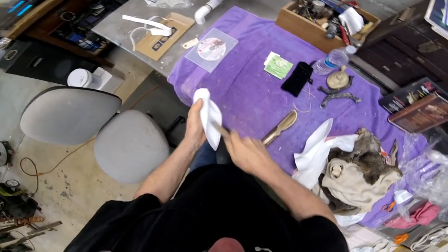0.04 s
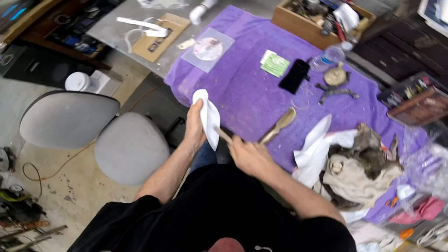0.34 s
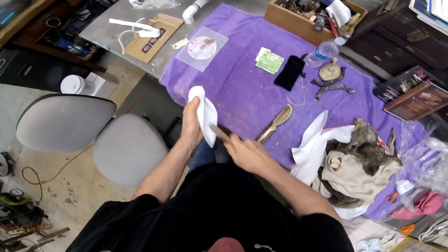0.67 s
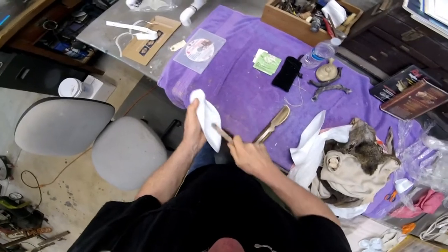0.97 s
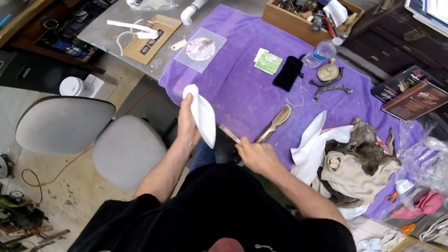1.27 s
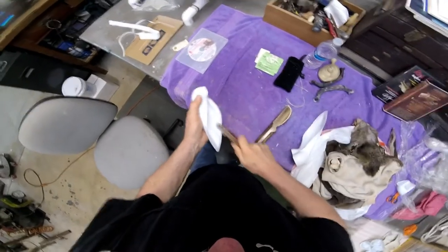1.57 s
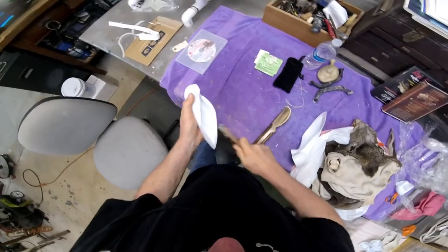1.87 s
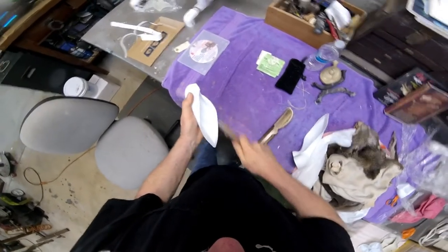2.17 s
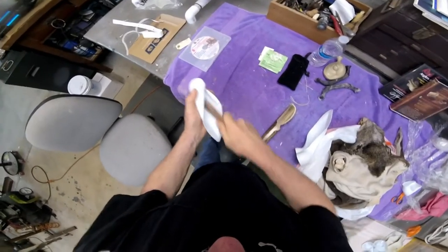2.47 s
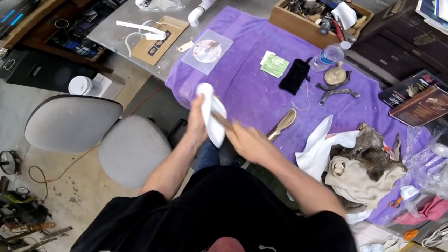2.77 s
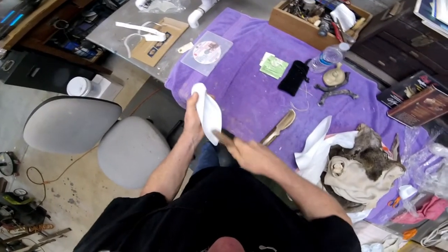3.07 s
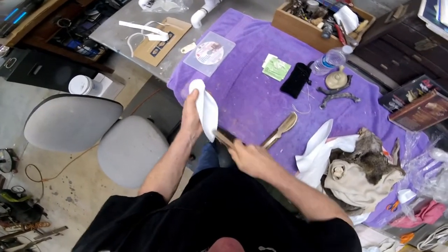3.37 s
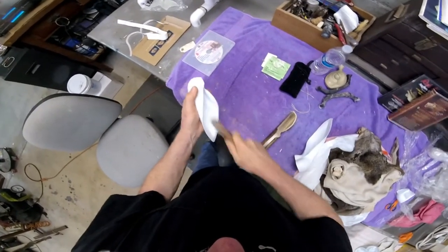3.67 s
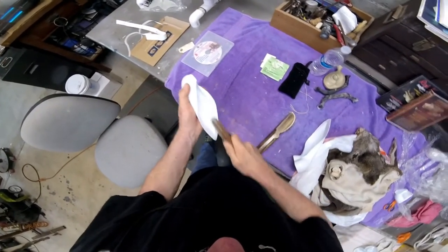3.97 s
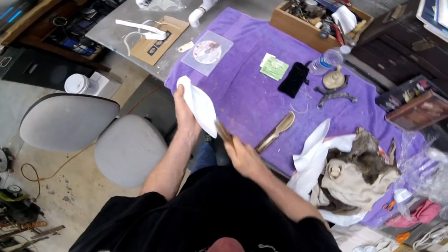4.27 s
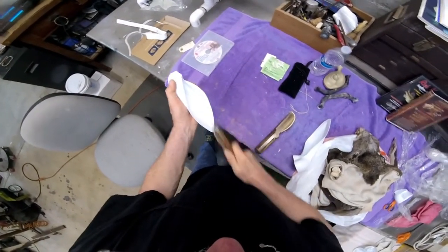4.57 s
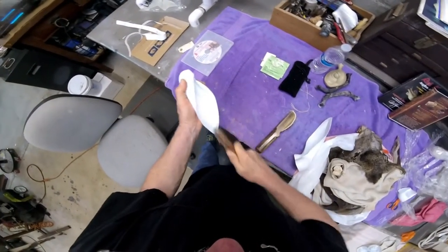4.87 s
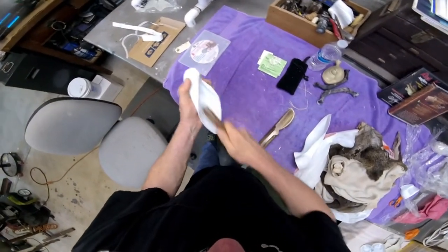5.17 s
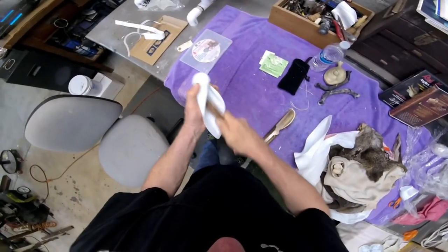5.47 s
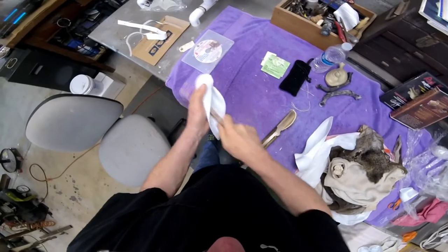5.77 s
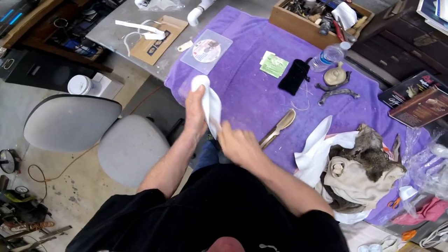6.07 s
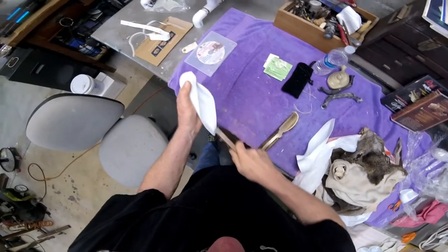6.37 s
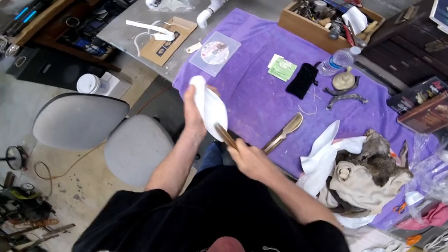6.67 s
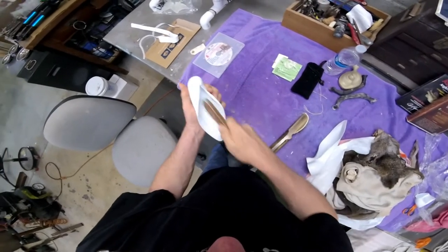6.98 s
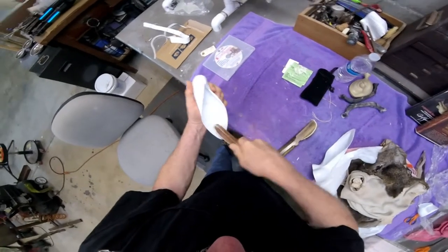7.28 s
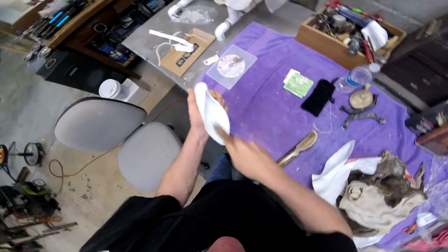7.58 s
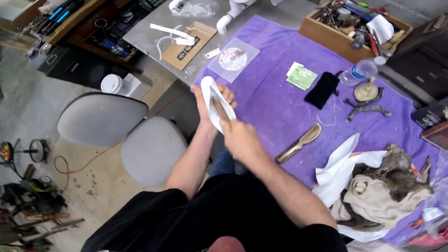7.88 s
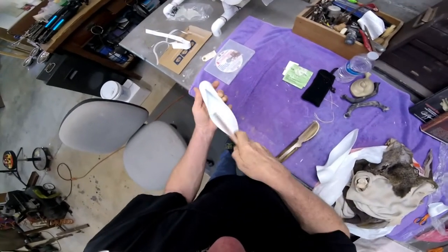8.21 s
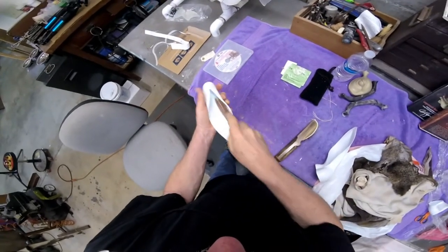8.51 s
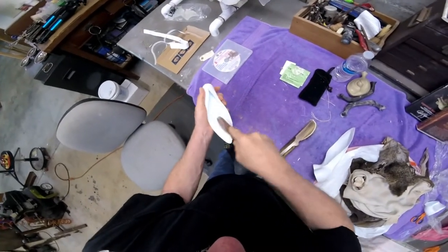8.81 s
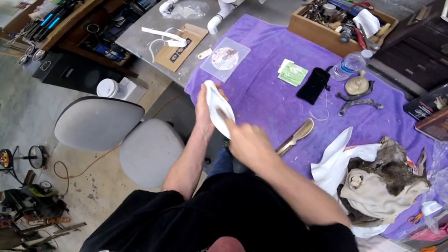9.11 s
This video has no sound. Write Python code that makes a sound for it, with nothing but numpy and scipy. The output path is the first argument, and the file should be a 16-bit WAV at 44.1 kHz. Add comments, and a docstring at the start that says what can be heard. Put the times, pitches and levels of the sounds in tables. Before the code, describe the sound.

Quick, even strokes of a steel file scrape a plastic edge, skipping and ticking between pushes in a small room with faint ventilation.

```python
"""A steel hand file works the edge of a hand-held plastic shell in a small workshop, in mono.
Each push rasps as the teeth shave the plastic; the file chatters on the way back and ticks as it is
set down. The shell colours every contact and the blade adds a hiss. The room answers, over a few
soft bumps, ventilation rumble and a low machine hum."""
import sys
import numpy as np
from scipy import signal
from scipy.fft import rfft, irfft
from scipy.io import wavfile
from scipy.ndimage import map_coordinates

SR = 44100
rng = np.random.default_rng(int(sys.argv[2]) if len(sys.argv) > 2 else 0)


def store_wav(level_fs):
    """Save 16-bit WAV to argv[1]."""
    pcm = np.round(np.clip(np.atleast_2d(level_fs), -1, 1) * 32767)
    wavfile.write(sys.argv[1], SR, pcm.T.astype(np.int16))


N = 407925

# cutting pushes: start_s, hardest_s, end_s, level_db, hiss_db, hiss_drift_db
PUSHES = [(0.065, 0.127, 0.21, -27.5, -27.5, -1), (0.386, 0.465, 0.539, -28.5, -29.5, 1),
          (0.716, 0.745, 0.853, -30, -26, 5), (1.058, 1.1, 1.165, -33, -36.5, -19),
          (1.384, 1.523, 1.547, -34.5, -38.5, -8), (1.67, 1.745, 1.788, -34, -33.5, 1.5),
          (1.992, 2.096, 2.118, -24, -29, 9), (2.366, 2.397, 2.58, -30, -30, 1.5),
          (2.779, 2.846, 2.955, -27.5, -26.5, 7.5), (3.147, 3.199, 3.317, -27.5, -30, -2),
          (3.493, 3.543, 3.658, -29, -29.5, -5), (3.795, 3.826, 3.916, -32, -23.5, 2),
          (4.087, 4.103, 4.246, -33.5, -32.5, -8.5), (4.387, 4.422, 4.501, -31.5, -34.5, 6),
          (4.696, 4.72, 4.847, -32, -32.5, 8.5), (5.042, 5.054, 5.209, -29.5, -30.5, -19),
          (5.383, 5.483, 5.541, -29, -29, -10), (5.717, 5.776, 5.884, -33.5, -37.5, 1),
          (6.043, 6.17, 6.262, -30.5, -34, 9), (6.453, 6.483, 6.6, -34.0, -34.0, -12),
          (6.564, 6.64, 6.698, -35, -35.5, -7), (7.024, 7.09, 7.181, -28.5, -29.5, 11),
          (7.39, 7.453, 7.554, -28.5, -30, 9), (7.79, 7.866, 7.99, -32, -33, 4.0),
          (8.565, 8.632, 8.722, -32.5, -33, 1), (8.951, 9.028, 9.1, -30.5, -31, 2)]
# shell response along the edge: time_s, ring_hz, ring_db, thud_rel_db, sizzle_db
EDGE_RESPONSE = [(.14, 2040, 5.5, -20, 4), (.75, 2550, 7, -14.5, 6.5), (1.45, 2550, -2, -13, 9),
                 (2.42, 2340, 8, -11.5, 2), (3.2, 2100, 5, -21.5, 4), (3.85, 1670, 10.5, -10.5, 1.5),
                 (4.75, 1450, 15, -14, 2), (5.7, 1620, 5.5, -10, -1), (6.5, 1430, 12.5, -13, -0.5),
                 (7.8, 1350, 12, -13.5, 8), (8.8, 1280, 8, -11.5, 10)]
# deeper swell of the late pushes: time_s, extra_depth_ratio
SWELL_DEPTH = [(6.5, 0), (8.5, 0.37)]


def strokes(ease_in_db=-8.5, ease_out_db=-10.0, attack_s=0.02, release_s=0.031,
            thud_trim_db=-2.2, hiss_trim_db=-1.9, hiss_follow=0.64, lean_db=11.5):
    """Many teeth tear tiny chips at once: a dense rasp that swells with the hand's trembling push."""
    out = np.zeros(N)
    edge_s, *edge_columns = np.transpose(EDGE_RESPONSE)
    for start, hardest, end, level_db, hiss_db, drift_db in PUSHES:
        ring_hz, ring_db, thud_db, sizzle_db = (np.interp(hardest, edge_s, c) for c in edge_columns)
        t = np.arange(int((end - start) * SR)) / SR
        teeth = .45 + stick_slip(t, rate_hz=1100, scatter=.5, spread_db=1.8, fade_s=.001)
        chips = blade_echo(teeth * rng.standard_normal(len(t)), t)
        bands = shell(chips, ring_hz, ring_db, sizzle_db=sizzle_db)
        thud, rasp, hiss = (unit(band[:len(t)]) for band in bands)
        rising, lifting = hand_ramps(start + t, start, hardest, end)
        ease_db = ease_in_db * rising + ease_out_db * lifting
        push_db = ease_db + np.interp(start, *np.transpose(SWELL_DEPTH)) * (ease_db - ease_db.mean())
        contact = np.clip(np.minimum(t / attack_s, (t[-1] - t) / release_s), 0, 1)
        tremble_db = 1.44 * wander(t, 57)
        yield_db = 0.25 * wander(t, 253)  # plastic gives way unevenly
        clog_db = 1.44 * wander(t, 115)  # chips clog and clear the teeth
        along = t / t[-1] - .5
        thud = amp(thud_db + thud_trim_db + lean_db * along) * thud  # the hand bears down
        body = amp(level_db + push_db) * (thud + amp(yield_db) * rasp)
        blade = amp(hiss_db + hiss_trim_db + hiss_follow * push_db + drift_db * along + clog_db) * hiss
        add(out, start, contact * amp(tremble_db) * (body + blade))
    return out


# return skips: start_s, hardest_s, end_s, level_db, thud_rel_db, hiss_rel_db, ring_hz, ring_db
SKIPS = [(0.016, 0.02, .055, -36, -12.5, -8, 3000, 10), (0.317, 0.33, .365, -25, -12.5, -5, 2450, 12),
         (0.57, 0.587, .605, -36.5, -2, -6.5, 1200, 8), (0.611, 0.665, .69, -26, -21, -8.5, 1950, 8),
         (0.865, 0.908, .91, -39, -17, -5.5, 980, 13), (0.986, 1.006, 1.045, -32, -11.5, -17, 2120, 6),
         (1.136, 1.163, 1.18, -29, -9, -5.5, 2230, 2), (1.764, 1.787, 1.81, -26, -10, -1, 1410, 4.5),
         (2.729, 2.743, 2.762, -29.5, -5.5, -3, 1630, 9), (3.082, 3.105, 3.125, -27.5, -9, -7.5, 1710, 1),
         (3.326, 3.337, 3.36, -35.5, -2.5, -5, 1850, 6), (3.429, 3.441, 3.464, -23, -15, -10, 2010, 20.5),
         (3.666, 3.693, 3.715, -26.5, -4.5, -10, 1750, 15),
         (3.716, 3.754, 3.777, -29, -4.5, -5.5, 1730, 10),
         (4.013, 4.034, 4.07, -31.5, -10.5, -13, 1650, 12.5), (4.273, 4.359, 4.375, -26, -14, -7, 1690, 14),
         (4.473, 4.504, 4.525, -27, -23, -4, 1500, 8), (4.975, 4.993, 5.025, -28.5, -18.5, -6.5, 1880, 33),
         (5.249, 5.316, 5.36, -27, -20.5, -7.5, 1910, 16.5),
         (5.564, 5.581, 5.612, -31.5, -7, -10, 1520, 15),
         (5.628, 5.674, 5.695, -23, -22.5, -9.5, 2200, 12.5), (5.919, 5.98, 5.988, -23.5, -9, -9, 2020, 6),
         (5.981, 6.011, 6.04, -18, -17.5, -6.5, 2320, 14), (6.293, 6.319, 6.33, -37, -4.5, -7, 1520, 18),
         (6.409, 6.417, 6.46, -31, -14.5, -7, 2300, 13), (6.952, 6.961, 6.985, -32.5, -10, -7, 1600, 16),
         (7.706, 7.715, 7.765, -36.5, -5.5, -5.5, 1610, 19),
         (8.359, 8.374, 8.41, -43, -12.5, -10.5, 1630, 13), (8.845, 8.886, 8.9, -31, -7, -5.5, 1370, 15),
         (9.147, 9.185, 9.2, -35, -12, -10.5, 1870, 15)]


def chatter(onset_db=-6.0, swell_db_per_s=143.0, lift_db=-17.0, skid=0.64):
    """Under light load the file hops from tooth to tooth: coarse catches over a skid."""
    out = np.zeros(N)
    for start, hardest, end, level_db, thud_db, hiss_db, ring_hz, ring_db in SKIPS:
        t = np.arange(int((end - start) * SR)) / SR
        landing_db = onset_db - swell_db_per_s * (hardest - start)  # short skips land hard
        rising, lifting = hand_ramps(start + t, start, hardest, end)
        load = amp(landing_db * rising ** 2 + lift_db * lifting ** 1.15)
        hops = skid + stick_slip(t, rate_hz=200, scatter=.35, spread_db=0.15, fade_s=0.0033)
        force = load * hops * rng.standard_normal(len(t))
        force = blade_echo(force, t, first_s=0.001217, last_s=0.000786)
        bands = shell(force, ring_hz, ring_db, hollow_db=5.5, sizzle_db=-2.7)
        add(out, start, amp(level_db) * mix_bands(bands, (thud_db, 0, hiss_db), len(t)))
    return out


# file knocks on the edge: time_s, level_db, thud_rel_db, hiss_rel_db, ring_hz
KNOCKS = [(.235, -30.5, -2.5, -19, 1200), (.89, -34, -9, 1, 2200), (.914, -26, -22, -5, 3030),
          (.922, -26, -25, -13, 2150), (.984, -23, -18, -11, 2220), (.991, -25, -18, -2, 2320),
          (1.371, -18, -8.5, -18.5, 1700), (1.668, -29, -1.5, -13, 1520), (1.773, -18.5, -9, -3, 1220),
          (1.975, -26, -22, -10, 1500), (2.314, -9.5, -21, -16, 2900), (2.327, -10.5, -19, -10, 3060),
          (2.346, -24.5, -21, 3, 3000), (3.085, -22, -16, -17, 1310), (3.205, -22, -33, -20, 2000),
          (3.958, -34, -7, -20, 1730), (3.975, -28, -6, -20.5, 1630), (4.677, -27, 5, -12, 1640),
          (4.848, -24.5, -36, -10, 1500), (4.854, -25, -33, -21, 1290), (4.98, -20, -5.5, -1, 2300),
          (4.99, -17, -23, 2, 1880), (5.235, -27.5, -9, -10, 1270), (5.397, -27.5, -31, 4, 2020),
          (5.411, -18.5, -30, -1.5, 2010), (5.926, -22.5, -9, -7, 2220), (6.969, -25.5, -12, -9, 1870),
          (7.353, -26.5, -23, -16, 1340), (7.367, -28, 4, -8.5, 1300), (7.998, -31, -31, -11, 1740),
          (8.497, -38, 7, -2, 1240), (8.51, -21.5, -5.5, -8, 1370), (8.765, -36.5, -0.5, -10, 1270),
          (8.845, -23, -16, -32, 1180)]


def ticks(gain_db=-5.5, hiss_trim_db=2.5, rise_s=0.000083, fade_s=0.0029):
    """Single hard catches of the teeth, each gone in milliseconds."""
    out, t = np.zeros(N), np.arange(SR // 50) / SR
    for start, level_db, thud_db, hiss_db, ring_hz in KNOCKS:
        force = (1 - np.exp(-t / rise_s)) * np.exp(-t / fade_s) * rng.standard_normal(len(t))
        bands = shell(force, ring_hz, ring_db=13.0, hollow_db=11.0, hollow_hz=291.0, ripple_db=1.16)
        tick = mix_bands(bands, (thud_db, 0, hiss_db + hiss_trim_db), SR // 250)
        add(out, start, amp(level_db + gain_db) * tick)
    return out


def stick_slip(t, rate_hz, scatter, spread_db, fade_s):
    """Teeth catch at uneven intervals; each release dies away."""
    gap_draw, size_draw = rng.standard_normal((int(t[-1] * rate_hz * 2) + 4, 2)).T
    gaps = np.exp(scatter * gap_draw)
    slip_s = (np.cumsum(gaps) - gaps[0]) / rate_hz
    latest = np.searchsorted(slip_s, t, side="right") - 1
    strength = amp(spread_db * np.clip(size_draw[latest], -2, 2))
    return unit(strength * np.exp(-(t - slip_s[latest]) / fade_s))


def hand_ramps(t, start, hardest, end):
    """Distance from the hardest push: 1 to 0 going in, 0 to 1 going out."""
    return np.interp(t, [start, hardest], [1, 0]), np.interp(t, [hardest, end], [0, 1])


def blade_echo(force, t, first_s=0.000362, last_s=0.000927, gain=.22):
    """A faint wave returns from the file's end; its delay shifts as the contact travels."""
    travel = (1 - np.cos(np.pi * t / t[-1])) / 2
    delay_s = (first_s + (last_s - first_s) * travel) * np.exp(0.224 * rng.standard_normal())
    return force + gain * map_coordinates(force, [(t - delay_s) * SR], order=3)


# file-on-plastic spectrum: freq_hz, gain_db
CONTACT_SPECTRUM = [(150, -3.5), (280, -7), (420, -6), (1000, -5.5), (2000, -4.5), (3000, -6.5), (4100, -5),
                    (5300, 1.5), (7000, -8.5), (9000, -15), (12000, -32.5), (14500, -43)]
# shell and blade resonances and dips: centre_hz, width_hz, gain_db
SHELL_MODES = [(452, 320, 7.5), (622, 33, 5.5), (730, 44, 6), (865, 41, -9.5), (905, 50, 5), (1248, 28, 6),
               (1580, 200, -0.5), (1720, 84, -5), (1878, 37, 5.5), (2141, 59, 1.5), (2610, 100, -0.5),
               (3082, 91, 4.5), (3440, 370, 0.6), (4350, 330, -2.9), (6545, 360, 6)]


def shell(force, ring_hz, ring_db, hollow_db=0., sizzle_db=0., hollow_hz=363.0, ripple_db=2.35,
          crossovers_hz=(800, 3600), size=2048):
    """A contact force radiates in three bands: shell thud, shell rasp, blade hiss."""
    f = np.arange(size // 2 + 1) * SR / size
    db = log_interp(f, *np.transpose(CONTACT_SPECTRUM))
    db += sum(gain_db * bell(f, hz, width_hz) for hz, width_hz, gain_db in SHELL_MODES)
    db += ring_db * bell(f, ring_hz, width_hz=0.66 * ring_hz)
    db += hollow_db * bell(f, hollow_hz, width_hz=186)
    db += sizzle_db * bell(f, 9640, width_hz=6100)
    db += ripple_db * wander(np.sqrt(f), .7)  # each contact point favours other small modes
    sound = signal.fftconvolve(force, minimum_phase(db, size))
    bass_cut = signal.butter(2, 220, "high", fs=SR, output="sos")  # a small shell radiates no bass
    sound = signal.sosfilt(bass_cut, sound)
    lowpasses = (signal.butter(4, hz, fs=SR, output="sos") for hz in crossovers_hz)
    thud, body = (signal.sosfiltfilt(lowpass, sound) for lowpass in lowpasses)
    return thud, body - thud, sound - body


# soft bumps: time_s, level_db
SOFT_BUMPS = [(2.148, -35), (2.201, -35.5), (2.26, -32), (2.31, -30), (2.365, -32), (2.414, -35),
              (2.46, -34), (2.55, -36.5), (2.637, -37.5), (5.778, -25.5)]


def bumps(pitch_hz=133.0, rise_s=0.0006, fade_s=0.0066, gain_db=8.5):
    """Dull, heavily damped knocks of a cycle or two."""
    out, t = np.zeros(N), np.arange(SR // 12) / SR
    envelope = (1 - np.exp(-t / rise_s)) * np.exp(-t / fade_s)
    for start, level_db in SOFT_BUMPS:
        hz = pitch_hz * np.exp(0.035 * rng.standard_normal())
        add(out, start, amp(level_db + gain_db) * envelope * np.sin(2 * np.pi * hz * t))
    return out


# reverberation bands: centre_hz, gain_db, t60_s
ROOM_BANDS = [(251, -11.5, 0.5), (734, -11, 0.58), (1400, -9, 0.41), (2970, -10, 0.44), (6140, -12, 0.39),
              (12000, -9.5, 0.24)]


def room(x, delay_s=0.00056, build_s=0.0042):
    """Bench, floor and walls return a diffuse tail; each band decays at its own rate."""
    t, f = np.arange(SR) / SR, np.arange(SR // 2 + 1)
    centres_hz = np.array(ROOM_BANDS)[:, 0]
    noise, tail = rfft(rng.standard_normal(SR)), np.zeros(SR)
    onset = np.clip((t - delay_s) / build_s, 0, 1)
    for weights, (_, gain_db, t60_s) in zip(np.eye(len(ROOM_BANDS)), ROOM_BANDS):
        band = irfft(noise * log_interp(f, centres_hz, weights))
        decay = onset * amp(-60 * t / t60_s)
        tail += amp(gain_db) * band * decay / np.linalg.norm(decay)
    return signal.fftconvolve(x, tail)[:N]


# ventilation spectrum: freq_hz, density_rel_db
AIR_SPECTRUM = [(12, -44.5), (20, -4.5), (43, -8.5), (88, -10.5), (129, -13.5), (152, -20.5), (650, -33),
                (1840, -33), (4190, -43), (6500, -33.5), (10400, -48.5), (12900, -55), (14000, -60)]


def ventilation(level_db=-50.5):
    """Moving air makes a steady low rumble."""
    f = np.arange(N // 2 + 1) * SR / N
    shape = amp(log_interp(f, *np.transpose(AIR_SPECTRUM)))
    return amp(level_db) * unit(irfft(rfft(rng.standard_normal(N)) * shape, N))


# machine tones: pitch_hz, level_db
HUM_TONES = [(87, -74), (119, -61.5)]


def machine_hum():
    """A machine hums, wavering in level and phase."""
    out, t = np.zeros(N), np.arange(N) / SR
    for pitch_hz, level_db in HUM_TONES:
        peak = np.sqrt(2) * amp(level_db + 2 * wander(t, 5.7))
        out += peak * np.sin(2 * np.pi * pitch_hz * t + 1.2 * wander(t, 5.4))
    return out


def amp(db):
    """Decibels to gain."""
    return 10 ** (np.asarray(db) / 20)


def unit(x):
    """Scale to rms 1."""
    return x / np.sqrt(np.mean(x ** 2) + 1e-18)


def add(out, start_s, x):
    """Mix x into out at start_s."""
    i = max(int(start_s * SR), 0)
    out[i:i + len(x)] += x[:max(len(out) - i, 0)]


def mix_bands(bands, levels_db, samples):
    """Sum bands, each set to its rms level over the first samples."""
    return sum(amp(db) * band / np.std(band[:samples]) for band, db in zip(bands, levels_db))


def log_interp(f, points_hz, values):
    """Interpolate on a log-frequency axis."""
    return np.interp(np.log(f + 1), np.log(points_hz), values)


def bell(f, centre_hz, width_hz):
    """Resonance curve, 1 at its centre."""
    return 1 / (1 + (2 * (f - centre_hz) / width_hz) ** 2)


def wander(x, rate):
    """Random curve, spread near 1, with `rate` new values per unit of x."""
    return np.interp(x * rate, np.arange(len(x)), rng.standard_normal(len(x))) * np.sqrt(3 / 2)


def minimum_phase(db, size):
    """Causal impulse response of a gain curve."""
    cepstrum = irfft(np.log(amp(db)))
    cepstrum[1:size // 2] *= 2
    cepstrum[size // 2 + 1:] = 0
    return irfft(np.exp(rfft(cepstrum)))[:size // 2]


def scene():
    """Filing, room, bumps and background, alike in both channels."""
    filing = strokes() + chatter() + ticks()
    mono = filing + room(filing) + bumps() + ventilation() + machine_hum()
    return np.array([mono, mono])


def record(dry, cutoff_hz=14250):
    """Soft-clip the peaks, then cut the top treble."""
    lowpass = signal.ellip(8, .2, 70, cutoff_hz, fs=SR, output="sos")
    return signal.sosfilt(lowpass, np.tanh(dry))


dry = scene()
out = record(dry)
store_wav(out)
```